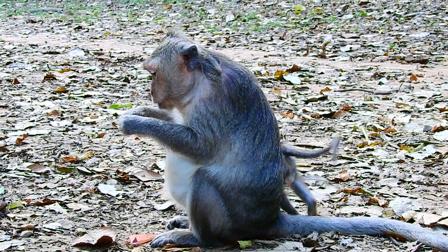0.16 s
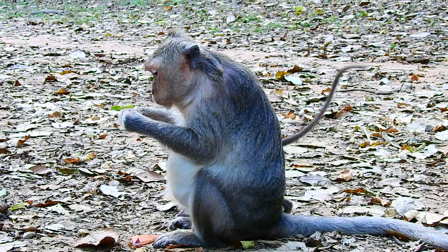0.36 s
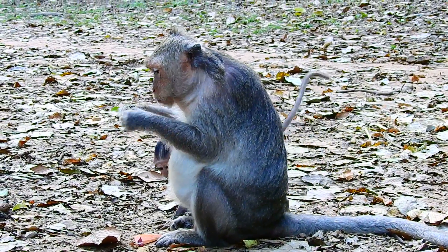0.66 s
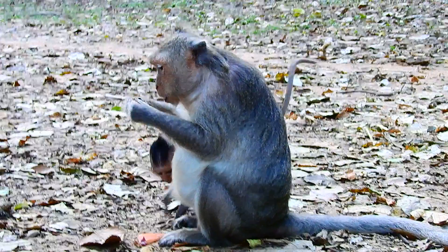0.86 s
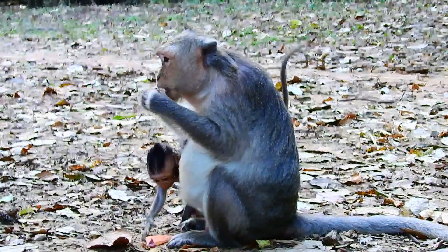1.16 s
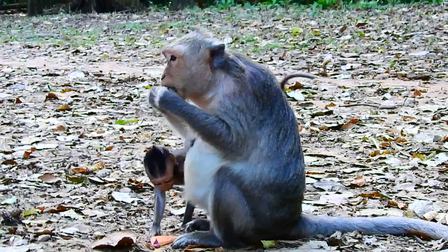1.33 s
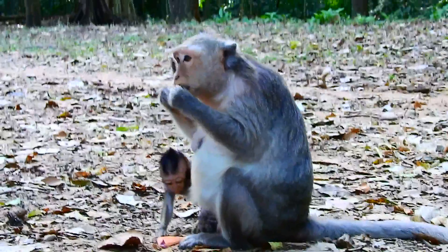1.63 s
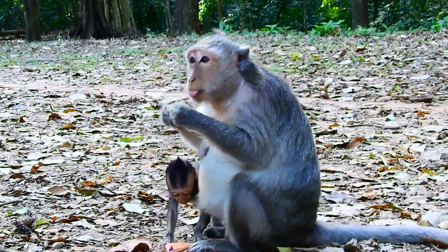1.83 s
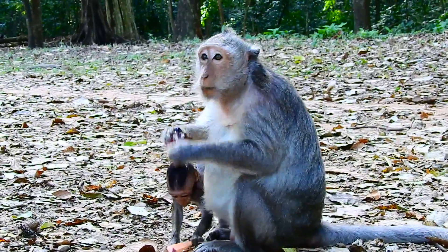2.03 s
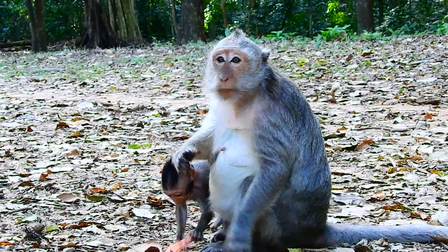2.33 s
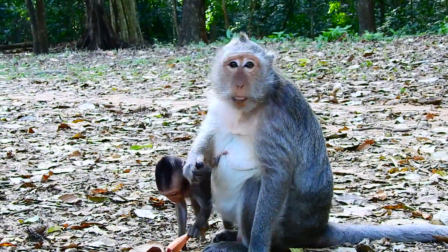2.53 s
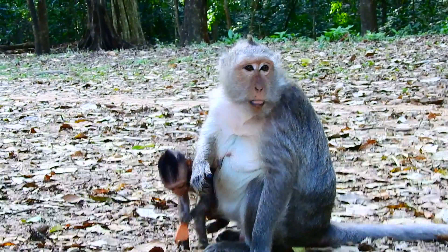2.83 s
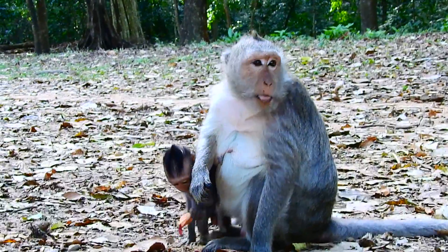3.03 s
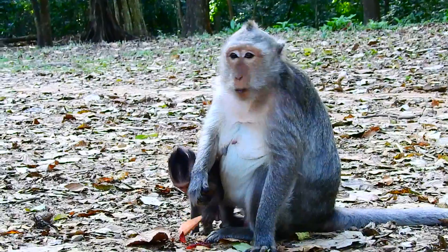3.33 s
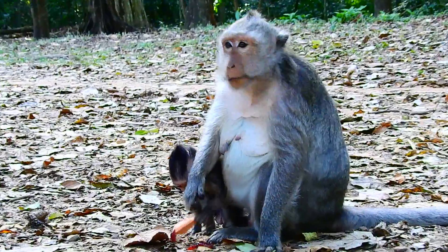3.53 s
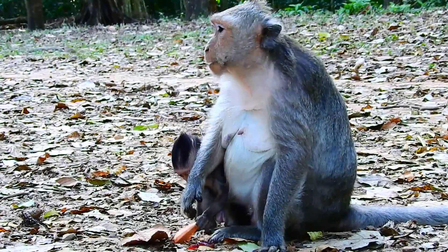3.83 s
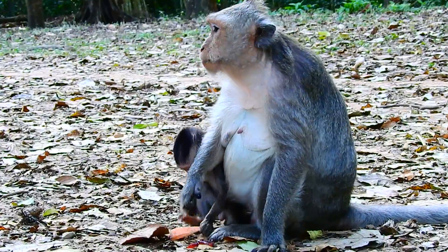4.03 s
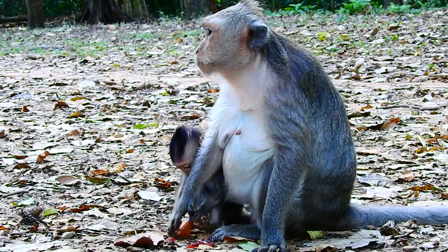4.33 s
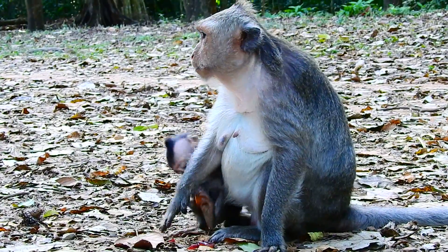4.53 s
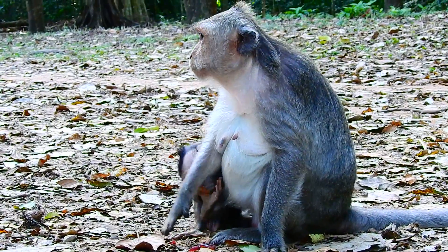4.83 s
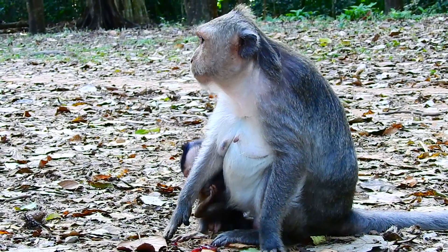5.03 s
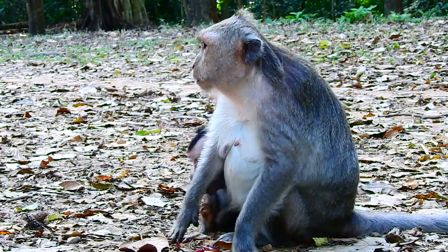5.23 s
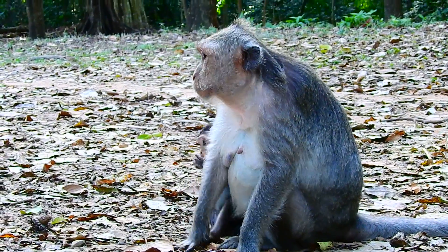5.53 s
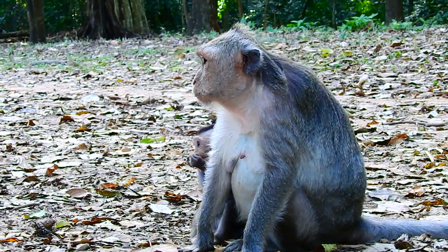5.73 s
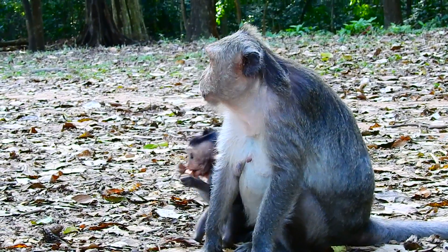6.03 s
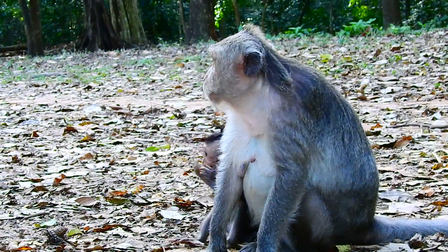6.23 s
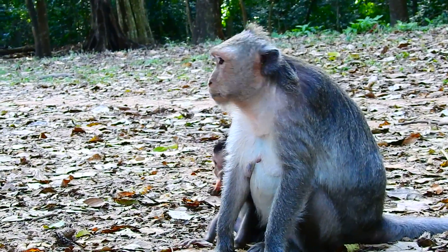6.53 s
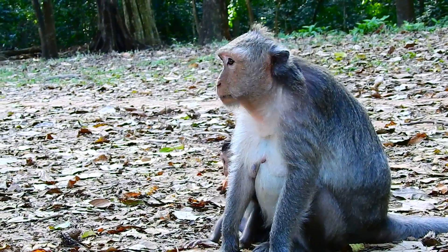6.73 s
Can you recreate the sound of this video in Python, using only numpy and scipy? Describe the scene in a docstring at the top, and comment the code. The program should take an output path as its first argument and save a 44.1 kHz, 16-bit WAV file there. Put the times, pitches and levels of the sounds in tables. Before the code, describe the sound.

A steady high insect buzz fills the forest, with one strong cicada ringing on a high pitch in quick four-pulse groups. It jumps louder early, then tires into rasp. Underneath are a sputtering idle and distant road rumble, rising near the end. Close to the microphone, leaves crackle briefly and a few short hard knocks sound; faint gliding bird calls end with a short squeak. Open air, wide stereo.

```python
"""Cicada in a forest

A cicada drones: its tymbals buzz, its hollow abdomen rings on the tenth harmonic, and the song throbs, sags
and turns raspy. Far cicadas sing as flutter and coloured noise, an engine idles as pulses ringing an exhaust,
and traffic rumbles as noise under a gliding drone. Close by, dry leaves rustle under two monkeys as clumps of
snaps, and a few knocks sound as short bands of noise with a woody ring; birds whistle faintly in gliding tones."""
import sys
import numpy as np
from scipy import signal
from scipy.fft import rfft, irfft
from scipy.io import wavfile
from scipy.ndimage import uniform_filter1d

SR = 44100
rng = np.random.default_rng(int(sys.argv[2]) if len(sys.argv) > 2 else 0)


def store_wav(level_fs):
    """Save 16-bit WAV to argv[1]."""
    pcm = np.round(np.clip(np.atleast_2d(level_fs), -1, 1) * 32767)
    wavfile.write(sys.argv[1], SR, pcm.T.astype(np.int16))


N = 303408
TIME = np.arange(N) / SR


def amp(db):
    """Level law: amplitude is ten to the twentieth part of the decibels."""
    return 10 ** (np.asarray(db) / 20)


def evened(x):
    """Normalisation to unit root-mean-square."""
    return x / np.sqrt(np.mean(x ** 2) + 1e-20)


def read(points, hz):
    """Spectral interpolation along a logarithmic frequency axis."""
    f, value = np.transpose(points)
    return np.interp(np.log(hz + 1), np.log(f + 1), value)


def follow(rows):
    """Linear interpolation in time: each column of a curve table at every sample."""
    s, *columns = np.transpose(rows)
    return [np.interp(TIME, s, column) for column in columns]


def add(mix, s, sound):
    """Superposition: a sound is added in place to the mix from time s."""
    part = mix[max(round(s * SR), 0):][:len(sound)]
    part += sound[:len(part)]


def wander(hz, edge=4):
    """Low-pass noise: unit random drift, mostly slower than hz and ending near edge times hz."""
    f = np.fft.rfftfreq(N, 1 / SR)
    rolloff = np.sqrt((1 + (f / hz) ** 2) * (1 + (f / hz / edge) ** 4))
    return evened(irfft(rfft(rng.standard_normal(N)) / rolloff, N))


def sides(left_db):
    """Level panning: the left channel exceeds the right by left_db."""
    return amp(np.array([[left_db], [-left_db]]) / 2)


# likeness of left and right in diffuse sound: f/Hz, coherence/1
COHERENCE = [(100, 1), (500, 0.99), (1000, 0.95), (2700, 0.88), (4000, 0.78), (6000, 0.37), (8000, 0.23),
             (12000, 0.052)]
# phase by which left leads: f/Hz, phase/rad
PHASE_LEAD = [(100, 0.04), (2700, 0.35), (5400, 0.0079), (5900, 0), (8100, 0.94)]


def pair(a, b):
    """Partial coherence: two unrelated spectra become one diffuse sound at two microphones."""
    f = np.linspace(0, SR / 2, len(a))
    same = np.clip(read(COHERENCE, f), 0, 1)
    left = a * np.exp(1j * read(PHASE_LEAD, f))
    right = same * a + np.sqrt(1 - same ** 2) * b
    return irfft(np.array([left, right]))


def wash(spectrum):
    """Spectral shaping: diffuse noise takes on a given colour, at unit level."""
    colour = amp(read(spectrum, np.fft.rfftfreq(N, 1 / SR)))
    first, second = rfft(rng.standard_normal((2, N))) * colour
    return evened(pair(first, second))


def forest(x, t60):
    """Multiple scattering: trunks and leaves return a dense tail of decaying noise."""
    decaying = rng.standard_normal((2, SR)) * amp(-60 * TIME[:SR] / t60)
    tail = pair(*rfft(decaying))
    return signal.fftconvolve(x[None], tail / np.linalg.norm(tail[0]), axes=1)[:, :N]


# colours of distant traffic, each set to unit level before use: f/Hz, relative density/dB
RUMBLE_SPECTRUM = [(20, -48), (40, -18), (52, -16), (70, 2), (95, 1.5), (115, -3), (150, 0), (200, -4.5),
                   (260, -10), (400, -15.5), (600, -42.5), (1200, -65)]
TYRE_SPECTRUM = [(200, -64), (400, 7), (620, 3.5), (800, -0.5), (1000, -1.5), (1300, -5), (2100, -6.5),
                 (4000, -7.5), (12000, -32)]
# course of the traffic before trim: t/s, rumble level/dB, tyre-noise level/dB
TRAFFIC_COURSE = [(0.0, -33, -45), (1.9, -35, -44), (3.9, -33.5, -43.5), (5.4, -32, -41.5),
                  (6.3, -32.5, -38.5), (6.88, -29, -37)]
# drone of a passing vehicle: t/s, firing f/Hz, level/dB
VEHICLE_DRONE = [(0, 76, -40.5), (1.4, 76, -38), (3.8, 76, -41.5), (4.1, 80, -33), (5.1, 77, -43.5),
                 (5.9, 67, -31.5), (6.88, 73, -35)]


def traffic(rumble_db=1, tyres_db=1, second_db=-9):
    """Broadband and periodic radiation: rumble, tyre noise and one engine's gliding two-harmonic drone."""
    low_db, road_db = follow(TRAFFIC_COURSE)
    hz, drone_db = follow(VEHICLE_DRONE)
    phase = 2 * np.pi * np.cumsum(hz * (1 + 0.01404 * wander(4.13))) / SR
    harmonics = np.sin(phase) + amp(second_db) * np.sin(2 * phase)
    drone = amp(drone_db) * evened(harmonics)
    drift_db = 1.1 * wander(5)
    rumble = amp(low_db + rumble_db) * wash(RUMBLE_SPECTRUM)
    tyres = amp(road_db + tyres_db + drift_db) * wash(TYRE_SPECTRUM)
    return rumble + tyres + drone


# tymbal harmonics from the first up: relative level/dB
TYMBAL_HARMONICS = [-53, -65, -38.5, -37, -8, -27.5, -29.5, -27, -25, 3, -10.5, -13.5, -19.5, -19, -6,
                    -22.5, -30.5, -37.5, -33.5, -24.5, -40.5, -53, -62, -60, -46.5]


def buzz(phase, flutter_hz):
    """Multipath fading: many shifting paths make each tymbal harmonic flutter on its own."""
    t = np.arange(0, N / SR + 1, 1 / 400)
    smooth = np.exp(-(np.fft.fftfreq(len(t), t[1]) / flutter_hz) ** 2 / 2)
    out, turn, harmonic = np.zeros((2, N)), np.exp(1j * phase), 1
    for db in TYMBAL_HARMONICS:
        harmonic = harmonic * turn
        random_phases = np.exp(2j * np.pi * rng.random((2, len(t))))
        fades = np.fft.ifft(evened(smooth) * random_phases, norm="ortho")
        out += [(np.interp(TIME, t, amp(db) * fade) * harmonic).real for fade in fades]
    return pair(*rfft(out))


# colour of cicada hiss, set to unit level before use: f/Hz, relative density/dB
HISS_SPECTRUM = [(1800, -68), (2400, -19), (2680, -7), (3000, -20.5), (3600, -20.5), (4000, -44),
                 (4700, -18), (5350, -4.5), (5800, -10.5), (7200, -16.5), (8050, -6), (9000, -78),
                 (10900, -51), (12000, -68)]


def chorus(far_db=-24, far_hz=537.0, hiss_db=-36, waver=0.001988):
    """Incoherent addition: a second cicada deep in the trees, over the smooth hiss of many more."""
    phase = 2 * np.pi * np.cumsum(far_hz * (1 + waver * wander(7.01))) / SR
    # distance dulls it
    far = signal.lfilter(*signal.butter(1, 4000, fs=SR), buzz(phase, flutter_hz=16))
    return amp(far_db) * far + amp(hiss_db + wander(5.9)) * wash(HISS_SPECTRUM)


# bird calls and far hoots: t/s, length/s, start f/Hz, end f/Hz, direct level/dB, pitch scatter/1
BIRD_CALLS = [(0.694, 0.22, 2850, 3600, -43, 0.043), (1.33, 0.27, 520, 495, -43.5, 0.03),
              (1.503, 0.11, 667, 580, -43, 0.062), (5.543, 0.25, 3460, 2863, -41, 0.039),
              (5.822, .17, 2490, 2050, -46, .012), (6.104, 0.25, 2151, 1760, -45, .022),
              (6.823, 0.08, 2440, 2160, -30.5, 0.017)]


def birds(t60=0.61):
    """Frequency modulation: gliding calls, some hoarse, heard direct and scattered by the trees."""
    out, quaver = np.zeros(N), wander(130)
    for s, length, start_hz, end_hz, db, scatter in BIRD_CALLS:
        glide = np.geomspace(start_hz, end_hz, int(length * SR))
        hz = glide * (1 + scatter * quaver[:len(glide)])
        tone = np.sin(2 * np.pi * np.cumsum(hz) / SR)
        add(out, s, amp(db) * signal.windows.tukey(len(hz), .5) * tone)
    return out + forest(out, t60)


# idling engine: t/s, firing rate f/Hz, level/dB
IDLE_COURSE = [(0, 14.5, -33), (1.3, 19.9, -34.5), (1.42, 14, -34), (2.5, 15.5, -39), (3.6, 16, -42.5),
               (6.88, 15.65, -38.5)]
# exhaust resonances: f/Hz, bandwidth/Hz, relative level/dB
EXHAUST_MODES = [(119.5, 28, 5.5), (137, 36, -12), (217, 93, -26), (313.9, 18, 8), (430, 64, -12)]


def idle(first_s=.05, pipe_hz=380):
    """Forced resonance: one thump and one puff of gas per firing ring the exhaust."""
    rate, level_db = follow(IDLE_COURSE)
    # whole turns mark firings, whose timing wanders
    turns = np.cumsum(rate) / SR - first_s * rate[0] + .03 * wander(3)
    thumps = np.diff(np.floor(turns), prepend=np.floor(turns[0]))
    puffs = np.exp(-(turns % 1) / .13) * rng.standard_normal(N)
    drive = 2 * evened(thumps) + evened(puffs)
    pipe = np.zeros(N)
    for hz, width, db in EXHAUST_MODES:
        pipe += amp(db) * signal.lfilter(*signal.iirpeak(hz, hz / width, SR), drive)
    muffler = signal.butter(3, [70, pipe_hz], "band", fs=SR, output="sos")
    return amp(level_db) * evened(signal.sosfilt(muffler, pipe))


# leaf rustles: centre t/s, level/dB, spread/s
LEAF_RUSTLES = [(0.816, -41, 0.011), (0.877, -39, 0.17), (1.604, -38, 0.018), (1.694, -35, 0.011),
                (2.033, -36.5, .04), (3.775, -36.5, 0.061)]


def leaves(per_s=1500):
    """Shot noise: clumps of tiny random snaps in dry leaves."""
    press = sum(amp(db) * np.exp(-2 * ((TIME - s) / length) ** 2) for s, db, length in LEAF_RUSTLES)
    snaps = rng.standard_normal((2, N)) * (rng.random((2, N)) < per_s / SR)
    # f/Hz, relative level/dB
    spectrum = [(300, -25), (900, 8.5), (1900, 8), (4000, 6), (8000, 7.5), (14000, -29)]
    colour = amp(read(spectrum, np.fft.rfftfreq(N, 1 / SR)))
    return press * evened(pair(*(rfft(snaps) * colour)))


# bands of the knocks, the first three rows together one knock:
# t/s, level/dB, centre f/Hz, half-width/octave, decay constant/s, ring relative to band/dB
KNOCK_BANDS = [(3.4522, -8, 4500, 0.73, 0.002, -24), (3.4532, -11.5, 724.6, 0.34, 0.0024, -7),
               (3.453, -13, 1860, 0.21, 0.0033, -33), (3.783, -21, 895, 1.3, 0.0043, -19),
               (4.2278, -15.5, 1210, 0.58, 0.00023, -52), (4.3079, -13, 870, 0.66, 0.00071, -32),
               (4.350, -23, 1397, 0.44, 0.00095, -34), (4.3588, -17, 460, 1.1, 0.0038, -38),
               (6.221, -19.5, 1049, 0.27, 0.0015, -51), (6.252, -20, 616, 0.22, 0.0034, -39)]
# modes of the woody ring: f/Hz, relative level/dB, t60/s
WOOD_MODES = [(234, -7, 0.11), (540, -4.5, 0.22), (660, -10, 0.075), (880, 6, 0.028), (1721.2, -33, 0.023),
              (2108, -1.5, 0.047), (3400, 1.5, 0.02)]


def knocks(echo_s=.0045, echo_db=-11, push=7, left_db=-3.5):
    """Impulse excitation: each band has a short push, a crackle and a modal woody ring; the ground echoes."""
    out, t = np.zeros(N), TIME[:8192]
    ring = sum(amp(db - 60 * t / t60) * np.sin(2 * np.pi * hz * t) for hz, db, t60 in WOOD_MODES)
    for s, db, hz, octaves, decay, ring_db in KNOCK_BANDS:
        burst = rng.standard_normal(len(t)) * np.exp(-t / decay)
        burst[0] += push
        edges = np.clip([hz / 2 ** octaves, hz * 2 ** octaves], 20, SR / 2 - 1000)
        band = signal.sosfilt(signal.butter(2, edges, "band", fs=SR, output="sos"), burst)
        add(out, s, amp(db) * (band / abs(band).max() + amp(ring_db) * ring))
    bounce = amp(echo_db) * np.interp(TIME - echo_s, TIME, out)
    return sides(left_db) * (out + bounce)


# course of the song, which suddenly swells, then slowly tires:
# t/s, level/dB, relaxed tymbal f/Hz, ring-harmonic timing jitter before strain/rad
SONG_COURSE = [(0, -20.5, 542.6, 0.24), (1.25, -25, 543, 0.25), (1.38, -9.5, 543, 0.15),
               (2.2, -14, 542.4, 0.22), (2.9, -11.5, 542.7, 0.28), (4.2, -15.5, 544, 0.42),
               (5.4, -16, 543.9, 0.52), (6.88, -21, 539, 0.64)]
# phrases, about two a second: first throb t/s, throb spacing/s
SONG_PHRASES = [(0.185, .095), (0.686, 0.11), (1.19, 0.11), (1.711, .104), (2.215, .11), (2.736, 0.1),
                (3.236, 0.1), (3.745, .104), (4.222, 0.1), (4.712, .113), (5.254, 0.094), (5.745, 0.11),
                (6.299, 0.11), (6.759, .11)]
# throbs per phrase, their width at half power, and the ringing left in the breaks between them
THROB_COUNT = 4
THROB_S, FADE_DB_PER_THROB = 0.051, 1.08
BREAK_DB = -19
# at full strain: fall of tymbal rate, plus more per radian of jitter
SAG_HZ, SAG_HZ_PER_RADIAN = 3.3, 5
# strain peaks this many throb spacings into a phrase; rasp multiplies the jitter
STRAIN_AT_THROB, STRAIN_S, RASP_RELAXED, RASP_STRAINED = 1.45, .12, 0.69, 1.18


def song():
    """Amplitude and frequency modulation: fading throbs set ring strength, strain sets rate and jitter."""
    level_db, rate, jitter = follow(SONG_COURSE)
    power, strain = np.full(N, amp(BREAK_DB) ** 2), np.zeros(N)
    t = np.arange(-THROB_S, THROB_S, 1 / SR)
    pulse = .5 ** ((2 * t / THROB_S) ** 4)
    for start, gap in SONG_PHRASES:
        middle = start + STRAIN_AT_THROB * gap
        strain += np.exp(-abs((TIME - middle) / STRAIN_S) ** 3)
        for k in range(THROB_COUNT):
            add(power, start + k * gap - THROB_S, amp(-FADE_DB_PER_THROB * k) ** 2 * pulse)
    sag = strain * (SAG_HZ + SAG_HZ_PER_RADIAN * jitter)
    rasp = RASP_RELAXED + (RASP_STRAINED - RASP_RELAXED) * strain
    return amp(level_db) * np.sqrt(power), rate - sag, jitter * rasp


RING_HARMONIC = 10


def cicada(buzz_db=-22.5, ring_db=-1, rasp=1.0, rasp_hz=65, stumble=2.3, buzz_rasp=0.29,
           flutter_hz=15, ring_left_db=-5.0, hiss_db=-24, swell=0.034):
    """Cavity resonance: unevenly timed tymbal clicks ring the abdomen; the ring swells with each throb."""
    throb, rate, jitter = song()
    phase = 2 * np.pi * np.cumsum(rate) / SR + rasp * jitter * wander(rasp_hz) / RING_HARMONIC
    # clicks that fall out of step cancel the ring for a moment; mean power is kept
    slip = stumble * jitter
    ring = throb * np.cos(slip * wander(46)) * 2 / np.sqrt(1 + np.exp(-2 * slip ** 2))
    direct = amp(ring_db) * sides(ring_left_db) * ring * np.cos(RING_HARMONIC * phase)
    # the diffuse buzz follows the throbs a little and spills into hiss where the song is raspy
    relative_throb = throb / (uniform_filter1d(throb, SR) + 1e-6)
    effort = evened(1 - swell + swell * relative_throb)
    rough = jitter * np.sqrt(jitter)
    overtones = buzz(phase + buzz_rasp * rough * wander(39), flutter_hz)
    hiss = amp(hiss_db) * rough * wash(HISS_SPECTRUM)
    return direct + effort * (amp(buzz_db) * overtones + hiss)


def scene():
    """Superposition of all sources, from the background to the cicada."""
    return traffic() + chorus() + birds() + idle() + leaves() + knocks() + cicada()


EDGE_HZ = 15000


def record(dry):
    """Band limitation: a linear-phase low-pass filter sets the recorder's upper edge."""
    lowpass = signal.firwin(511, EDGE_HZ, window=("kaiser", 9), fs=SR)
    return signal.oaconvolve(dry, lowpass[None], "same")


dry = scene()
out = record(dry)
store_wav(out)
```